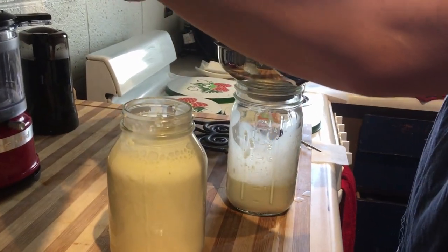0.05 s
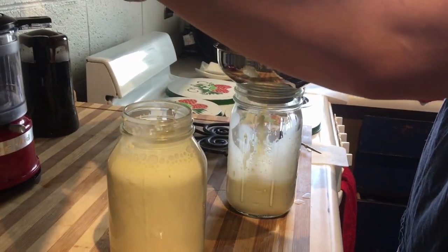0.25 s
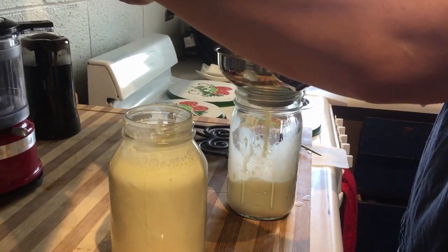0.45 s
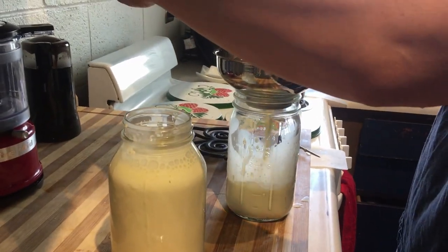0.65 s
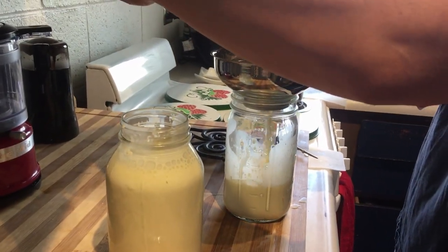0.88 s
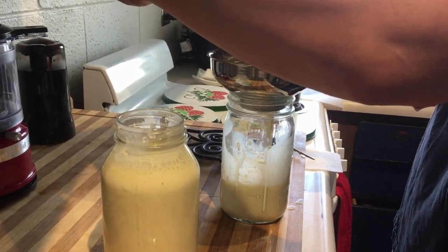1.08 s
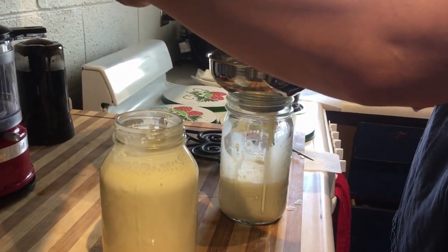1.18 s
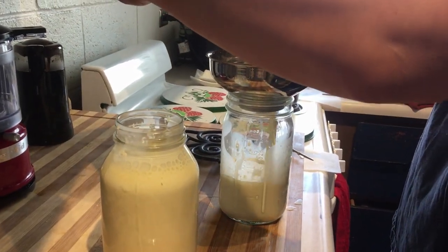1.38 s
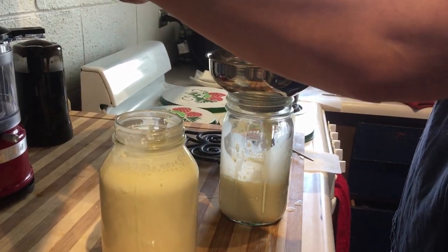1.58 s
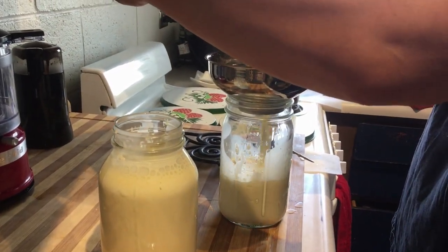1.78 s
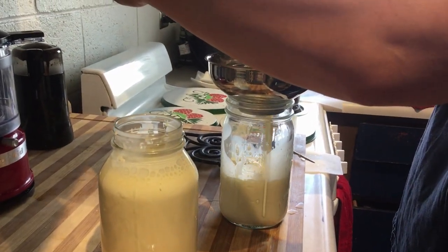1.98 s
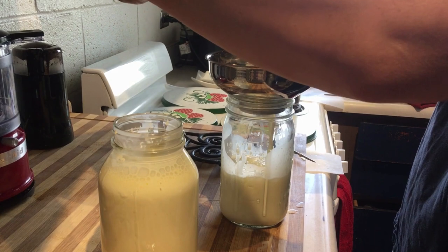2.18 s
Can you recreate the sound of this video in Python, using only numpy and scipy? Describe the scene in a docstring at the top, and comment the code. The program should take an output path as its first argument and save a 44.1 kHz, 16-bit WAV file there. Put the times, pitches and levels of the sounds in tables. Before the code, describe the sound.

Thick liquid plops and trickles into a glass jar in a quiet kitchen.

```python
"""A snap of foam in a quietly humming kitchen, then low plops: a creamy liquid runs through a strainer
into a glass jar on the counter, close to a single microphone. Thick gobs trap air and throw a wet
spatter; small bubbles ring, foam films tear and a thin trickle stirs the air in the jar.
The jar rings along, and the counter and wall throw back quick echoes."""
import sys
import numpy as np
from scipy import signal
from scipy.fft import rfft, irfft
from scipy.io import wavfile

SR = 44100
rng = np.random.default_rng(int(sys.argv[2]) if len(sys.argv) > 2 else 0)


def persist_wave(psi):
    """Save psi, clipped to +-1, as 16-bit WAV."""
    counts = np.round(np.clip(psi, -1, 1) * 32767).astype(np.int16)
    wavfile.write(sys.argv[1], SR, np.atleast_2d(counts).T)


N = 99225
TIME = np.arange(N) / SR

# modes of a gob's soft push on jar and counter: f/Hz, t60/s, level/dB
THUD_MODES = [(217, 0.063, -61), (303, 0.025, -51)]
# gobs landing in the jar: t/s, f/Hz, plop level/dB, plop t60/s, squelch level/dB, spray level/dB
GOBS = [(0.243, 483, -30, 0.025, -48, -48.5), (.3125, 456, -29.5, 0.037, -48.5, -64),
        (0.327, 358.5, -32.5, 0.076, -54, -59), (0.343, 397, -29.5, 0.019, -48.5, -60),
        (.3600, 440, -40, 0.033, -59, -83), (0.42, 426, -45, 0.046, -52, -56.5),
        (.4370, 443, -33, 0.013, -52.5, -67), (.4710, 451, -31.5, 0.021, -82, -76),
        (.5660, 440, -45, 0.028, -77, -82), (0.595, 440, -51, 0.038, -57.5, -61),
        (0.637, 467, -47, 0.031, -58, -70), (0.8019, 497, -32, 0.02, -61.5, -61),
        (0.826, 477, -27.5, 0.013, -54, -60.5), (.8510, 440, -35.5, 0.024, -54, -76),
        (0.8649, 480, -30, .022, -57.5, -75), (1.0120, 498, -30.5, 0.014, -49, -45.5),
        (1.1795, 466, -30.5, 0.016, -57, -58), (1.313, 525, -39.5, 0.024, -50.5, -52),
        (1.3327, 506, -36, 0.033, -51, -57), (1.5486, 513, -43, 0.033, -61, -74),
        (1.589, 525, -44.5, 0.032, -71, -75), (1.699, 513, -37.5, 0.018, -56.5, -72),
        (1.8655, 498, -36, 0.057, -55.5, -54.5), (1.9042, 510, -33.5, 0.032, -62, -52),
        (2.1680, 580, -40, 0.041, -59, -62)]
def plops():
    """Up front, each gob lands with a soft thud and traps a pocket of air that rings for a few cycles."""
    out = np.zeros(N)
    average_db = np.mean([gob[2] for gob in GOBS])
    thud = sum(from_db(db) * ring(hz, t60, attack_s=0.0009) for hz, t60, db in THUD_MODES)
    for s, hz, db, t60, _, _ in GOBS:
        pocket = from_db(db + 2) * ring(hz, t60, attack_s=0.0009, rise_per_s=0.99)
        thud_db = 0.1 * (db - average_db) + 6 * s   # the thud grows as the jar fills
        add(out, s, pocket + from_db(thud_db) * thud)
    return out


# spectra of the wet squelch and of the fine spray: f/Hz, level/dB
SQUELCH_COLOUR = [(620, 3.5), (1100, 5), (1700, 5.5), (2400, -0.5), (4300, 3.5)]
SPRAY_COLOUR = [(4300, -6), (6500, -1), (9000, 1), (11000, -6.5), (15000, -5)]
def spatter():
    """Each gob squelches as it sinks in and throws a short spray of fine droplets."""
    squelch_level, spray_level = np.zeros((2, N))
    for s, _, _, _, squelch_db, spray_db in GOBS:
        add(squelch_level, s, from_db(squelch_db - 1) * decay(TIME, t60=0.075))
        add(spray_level, s, from_db(spray_db - 2.5) * swell(TIME, attack_s=0.0094, t60=0.099))
    squelch = grains(SQUELCH_COLOUR, per_s=1800, q=9.8, spread_db=1, bands=20)
    spray = grains(SPRAY_COLOUR, per_s=7200, q=15, spread_db=-3.5, bands=20)
    return squelch_level * squelch + spray_level * spray


# small bubbles in the jar: t/s, f/Hz, level/dB
BUBBLES = [(.164, 3050, -48.5), (.246, 2350, -46), (.259, 1430, -40), (.277, 1900, -45),
           (0.3278, 1276, -30.5), (0.328, 1010, -37), (0.342, 3550, -39), (.342, 1875, -30.5),
           (.344, 2340, -37), (0.354, 1902, -33), (.357, 2320, -46), (.358, 1950, -43), (0.441, 1830, -47),
           (0.442, 3030, -39), (.503, 1900, -45), (0.508, 5850, -35), (0.524, 1370, -46.5),
           (.538, 1940, -41), (0.538, 5330, -40), (.556, 1870, -57), (.607, 1860, -45.5), (.734, 2570, -41),
           (0.76, 2067, -40.5), (0.806, 1403, -41), (0.829, 994, -41), (.829, 2120, -63),
           (0.864, 3410, -43.5), (1.013, 636, -75), (1.014, 877, -44), (1.032, 2200, -47.5),
           (1.046, 2140, -47.5), (1.056, 4330, -41), (1.063, 2050, -52), (1.138, 2140, -44),
           (1.17, 3210, -43.5), (1.201, 983, -41.5), (1.283, 2050, -45.5), (1.337, 1900, -48),
           (1.392, 1030, -45.5), (1.402, 2147, -44.5), (1.401, 2700, -43.5), (1.411, 2064, -44),
           (1.587, 1173, -43), (1.866, 635, -43.5), (1.868, 980, -42.5), (1.868, 850, -42.5),
           (1.894, 1264, -42), (1.905, 653, -47), (1.937, 2680, -45.5), (2.231, 2155, -48.5)]
def small_bubbles(cycles=43.4):
    """Each bubble rings for the same number of cycles, rising in pitch as it nears the surface."""
    out = np.zeros(N)
    for s, hz, db in BUBBLES:
        add(out, s, from_db(db - 2) * ring(hz, t60=cycles / hz, attack_s=0.00075, rise_per_s=0.5))
    return out


# foam films snapping on the surface: t/s, level/dB, centre f/Hz
SNAPS = [(0.166, -44, 9160), (.165, -45, 12600), (.165, -45.5, 5300), (.2495, -49.5, 7100),
         (0.38, -48, 9200), (0.523, -47.5, 6000), (0.7755, -47, 9500), (.8436, -50, 8700),
         (0.8638, -42, 6200), (0.959, -49, 6020), (1.014, -42, 14400), (1.021, -46, 9800),
         (1.1762, -45.5, 8200), (1.1928, -38.5, 12600), (1.195, -41.5, 9400), (1.136, -53, 7160),
         (1.3021, -52, 8000), (1.3226, -42.5, 6430), (1.362, -44.5, 7550), (1.429, -42, 6400),
         (1.4367, -42.5, 9000), (1.438, -41, 7040), (1.508, -50.5, 8800), (1.6582, -52.5, 6100),
         (1.661, -46.5, 4180), (1.838, -50.5, 3630), (1.72, -48.5, 8500), (1.9054, -37, 7800),
         (1.908, -43, 11000), (1.908, -43.5, 5860), (2.009, -52.5, 11100), (2.076, -49.5, 7560),
         (2.167, -42.5, 6900)]
def foam_snaps(ticks_per_s=4600, q=9.7):
    """A film crackles faintly as it stretches, then tears in a quick run of bright ticks."""
    out = np.zeros(N)
    t = TIME[:SR // 10] - 0.025   # the film goes at t = 0
    bright = signal.butter(2, [3000, 12000], "band", fs=SR, output="sos")
    tearing = swell(np.maximum(t, 0), attack_s=0.0012, t60=0.044)
    stretching = from_db(-12) * np.exp(-np.abs(t) / 0.0023)
    envelope = tearing / tearing.max() + stretching
    envelope_rms = np.sqrt(np.mean(envelope ** 2))
    for s, db, hz in SNAPS:
        ticks = envelope * rng.choice([-1, 1], len(t)) * (rng.random(len(t)) < ticks_per_s / SR)
        tear = resonance(ticks, hz, hz / q) + from_db(-18.5) * signal.sosfilt(bright, ticks)
        add(out, s + t[0], from_db(db - 14.5) * envelope_rms * rms_one(tear))
    return out


# course of the gurgle: t/s, level/dB
GURGLE_LEVEL = [(0.2, -71), (0.3, -52.5), (0.43, -61.5), (0.66, -62), (0.73, -64), (0.88, -51), (0.98, -73),
                (1.07, -61), (1.4, -54), (1.5, -69.5), (1.7, -59), (1.8, -67), (1.92, -57), (2.05, -59),
                (2.25, -85)]
# its spectrum: f/Hz, level/dB
GURGLE_COLOUR = [(290, -4), (360, 3.5), (440, -5.5), (520, -3.5), (660, 1)]
def gurgle():
    """The stream gurgles with low, briefly ringing bubbles."""
    bubbles = grains(GURGLE_COLOUR, per_s=300, q=17.3, spread_db=2.5, bands=12)
    return level(GURGLE_LEVEL, -2.5) * bubbles


# course of the trickle: t/s, level/dB
TRICKLE_LEVEL = [(0.2, -52.5), (0.27, -57), (0.37, -65), (0.48, -61.5), (0.53, -53), (0.6, -62),
                 (0.78, -60.5), (0.83, -52.5), (0.94, -73), (0.968, -47.5), (1.0, -70), (1.04, -51),
                 (1.12, -60), (1.4, -56), (1.52, -57.5), (1.59, -56), (1.82, -65), (1.9, -55.5),
                 (2.08, -59), (2.25, -60.5)]
# its spectrum: f/Hz, level/dB
TRICKLE_COLOUR = [(700, -2.5), (1000, 5.5), (1400, 0), (1700, -4), (2150, 1.5), (2700, -24.5), (3400, -19)]
def trickle():
    """Droplets of the thin stream land in a dense run of tiny pitched rings."""
    droplets = grains(TRICKLE_COLOUR, per_s=700, q=38, spread_db=3, bands=28)
    return level(TRICKLE_LEVEL, -6.5) * droplets


# course of the jar's hollow note: t/s, level/dB
HOLLOW_LEVEL = [(0.3, -67), (0.39, -61.5), (0.56, -58.5), (0.68, -59.5), (0.76, -73.5), (2.25, -79.5)]
def hollow_note(hz=440, width_hz=82):
    """The stream stirs the air in the jar into a narrow band of noise."""
    air = resonance(rng.standard_normal(N), hz, width_hz)
    return level(HOLLOW_LEVEL, -2.5) * rms_one(resonance(air, hz, width_hz))


# course of the foam's crackle: t/s, level/dB
FOAM_LEVEL = [(0.2, -63), (0.35, -67), (0.47, -66), (0.53, -63.5), (0.58, -70), (0.74, -73.5), (0.84, -78),
              (0.93, -80), (1.0, -67), (1.04, -60), (1.1, -68), (1.34, -61.5), (1.5, -72), (1.6, -75),
              (1.7, -64.5), (1.8, -87), (1.93, -64.5), (2.05, -70), (2.25, -67)]
# its spectrum: f/Hz, level/dB
FOAM_COLOUR = [(3500, 0), (5000, -3), (7000, 2.5), (9000, -6), (11000, -5.5), (15000, -3)]
def foam_crackle(clusters_per_s=45):
    """Behind the plops, tiny foam bubbles crackle in random clusters."""
    drift = rms_one(np.interp(TIME * clusters_per_s, np.arange(1000), rng.standard_normal(1000)))
    crackle = grains(FOAM_COLOUR, per_s=2200, q=30, spread_db=6, bands=36)
    return level(FOAM_LEVEL, -6 + 4.5 * drift) * crackle


# modes of the jar's air and glass: f/Hz, width/Hz, level/dB
JAR_MODES = [(364, 44, 4.5), (839, 10.6, -0.5), (1030, 33, 4.5), (1340, 16, -44), (1900, 32, 2),
             (2156, 60, 5.5), (3210, 110, 2.5), (3260, 14, -22), (4650, 94, -2), (5450, 58, -1),
             (5850, 59, -14), (6900, 70, -6), (7860, 30, 0), (9300, 150, 4)]
def jar(x, bounce_s=0.00229, bounce_gain=0.16):
    """The jar rings along, and the sound bounces to and fro inside it."""
    rung = x + sum(from_db(db) * resonance(x, hz, width) for hz, width, db in JAR_MODES)
    return rung + sum(bounce_gain ** k * delayed(rung, k * bounce_s) for k in range(1, 5))


# echoes off counter and wall, after the direct sound: delay/s, gain/ratio
ECHOES = [(.00445, 0.98), (.0065, 0.4), (.0095, -.25), (.0160, 0.02)]
def kitchen(x):
    """Quick echoes reach the microphone from the nearby counter and wall, with a short diffuse tail."""
    near = x + sum(gain * delayed(x, delay) for delay, gain in ECHOES)
    tail = rng.standard_normal(SR // 2) * swell(TIME[:SR // 2], attack_s=0.0062, t60=0.18)
    band = signal.butter(1, [900, 9500], "band", fs=SR, output="sos")
    tail = signal.sosfilt(band, tail / np.linalg.norm(tail))
    return near + from_db(-2) * signal.fftconvolve(x, tail)[:N]


# spectrum of the quiet kitchen: f/Hz, relative level/dB
ROOM_COLOUR = [(20, -24), (40, -7.5), (65, -0.5), (90, -3.5), (128, -1.5), (150, -15), (200, -10.5),
               (280, -12), (500, -18.5), (1000, -17.5), (2000, -29), (2700, -28), (3150, -29.5),
               (3800, -36), (5000, -41), (9000, -46.5), (16000, -57)]
# tones of an appliance: f/Hz, rms level/dB
HUM = [(64, -67), (124, -73.5)]
def room_tone():
    """In the background: low rumble, faint hiss and an appliance's hum."""
    hz = np.maximum(np.arange(N // 2 + 1) * SR / N, 1)
    air = irfft(rfft(rng.standard_normal(N)) * gain_at(ROOM_COLOUR, hz), N)
    hum = sum(from_db(db) * np.sqrt(2) * np.sin(2 * np.pi * (f * TIME + rng.random())) for f, db in HUM)
    return from_db(-55.5) * rms_one(air) + hum


def ring(hz, t60, attack_s, rise_per_s=0):
    """A dying sine whose pitch climbs by the share rise_per_s each second."""
    t = TIME[:SR // 8]
    return np.sin(2 * np.pi * hz * (t + rise_per_s * t * t / 2)) * swell(t, attack_s, t60)


def grains(colour, per_s, q, spread_db, bands):
    """Tiny bubbles of random size, dealt to resonances spread over the colour's range; rms 1."""
    sizes = from_db(spread_db * np.minimum(rng.exponential(1, N), 3)) * rng.choice([-1, 1], N)
    clicks = sizes * (rng.random(N) < per_s / SR)
    dealt = rng.integers(0, bands, N)
    out = np.zeros(N)
    for k, hz in enumerate(np.geomspace(colour[0][0], colour[-1][0], bands)):
        out += gain_at(colour, hz) / np.sqrt(hz) * resonance(clicks * (dealt == k), hz, hz / q)
    return rms_one(out)


def resonance(x, hz, width_hz):
    """Two-pole resonance with gain 1 at its peak."""
    r = np.exp(-np.pi * width_hz / SR)
    feedback = [1, -2 * r * np.cos(2 * np.pi * hz / SR), r * r]
    return signal.lfilter(np.array([1, 0, -1]) * (1 - r * r) / 2, feedback, x + 1e-18)


def decay(t, t60):
    """Fall by 60 dB every t60 seconds."""
    return np.exp(-np.log(1000) * t / t60)


def swell(t, attack_s, t60):
    """Rise, then die away."""
    return (1 - np.exp(-t / attack_s)) * decay(t, t60)


def level(curve, offset_db):
    """Gain over time from a level curve."""
    return from_db(np.interp(TIME, *np.transpose(curve)) + offset_db)


def gain_at(colour, hz):
    """Gain of a spectrum, read on a log-frequency axis."""
    f, db = np.transpose(colour)
    return from_db(np.interp(np.log(hz), np.log(f), db))


def from_db(db):
    """Decibels to gain."""
    return 10 ** (np.asarray(db) / 20)


def rms_one(x):
    """Scale to rms 1."""
    return x / np.sqrt(np.mean(x ** 2) + 1e-20)


def delayed(x, s):
    """The same sound, s seconds later."""
    return np.interp(TIME - s, TIME, x, left=0)


def add(out, s, sound):
    """Mix a sound in at s seconds."""
    i = int(s * SR)
    out[i:i + len(sound)] += sound[:N - i]


def scene(pour_start_s=0.208, fade_in_s=0.034):
    """The pour from close by, in mono: jar in front, kitchen behind."""
    splashes = plops() + spatter() + small_bubbles() + foam_snaps()
    flow = np.clip((TIME - pour_start_s) / fade_in_s, 0, 1)
    stream = flow * (gurgle() + trickle() + foam_crackle() + hollow_note())
    return (kitchen(jar(splashes + stream)) + room_tone())[None]


def record(dry, cutoff_hz=15750):
    """The microphone's signal, with the top cut steeply."""
    return signal.sosfilt(signal.ellip(12, 0.2, 80, cutoff_hz, fs=SR, output="sos"), dry)


dry = scene()
out = record(dry)
persist_wave(out)
```